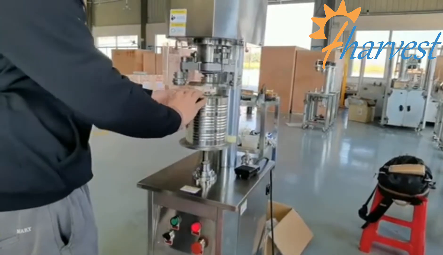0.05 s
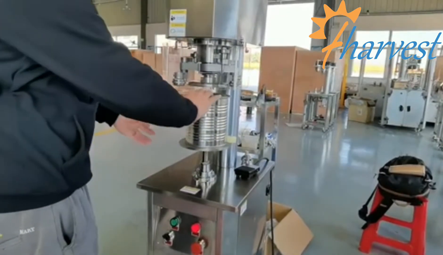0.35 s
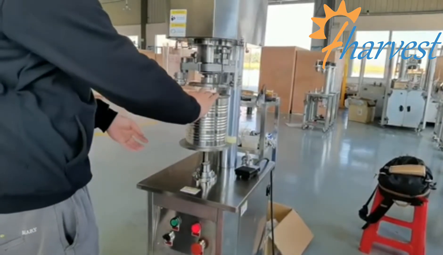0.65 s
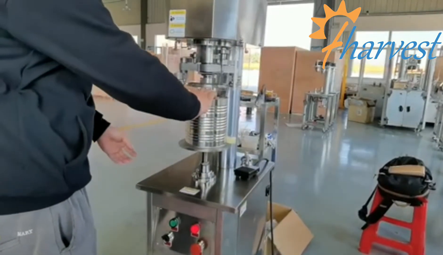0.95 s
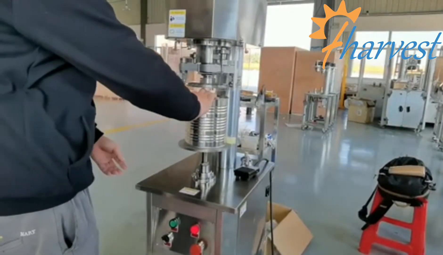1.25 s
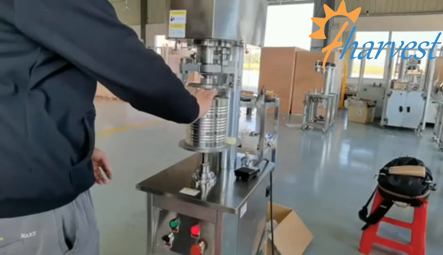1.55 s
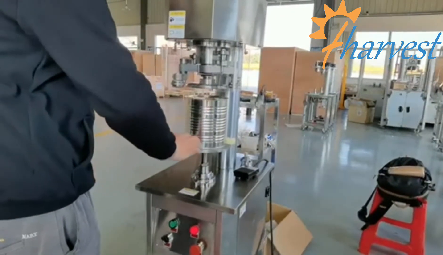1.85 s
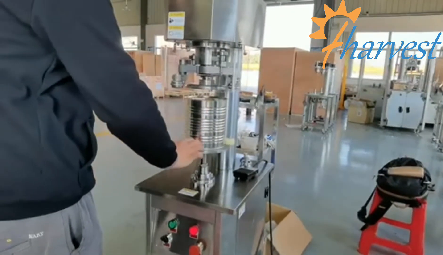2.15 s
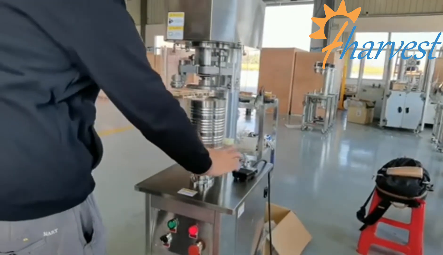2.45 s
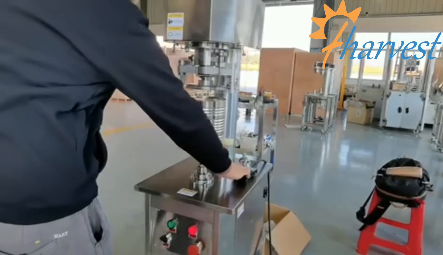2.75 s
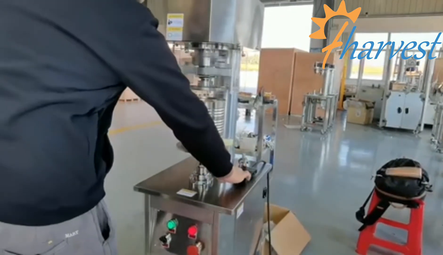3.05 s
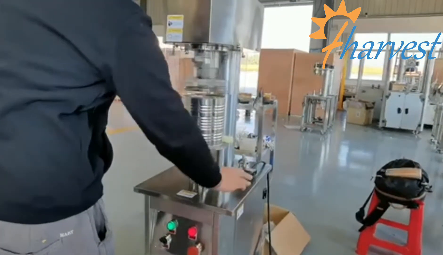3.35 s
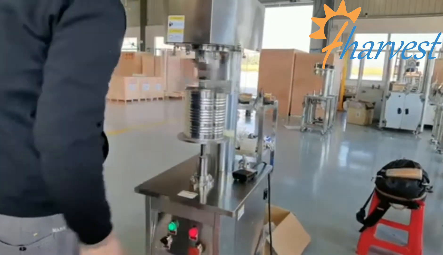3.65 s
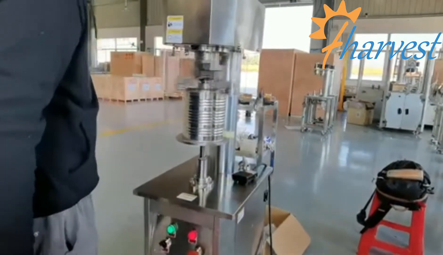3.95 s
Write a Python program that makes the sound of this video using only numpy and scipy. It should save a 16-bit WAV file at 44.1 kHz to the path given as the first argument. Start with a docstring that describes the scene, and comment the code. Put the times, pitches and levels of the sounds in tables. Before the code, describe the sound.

A can seaming machine starts up close by, over a faint factory hall drone. First a metal can scrapes, squeaks and knocks, hardest at 0.6 seconds. A sleeve rustles softly, and a steel part rings at 1.6 seconds. From 2.4 seconds a switch snaps and the motor hums loudly. Rollers grind and briefly squeal on the rim until 3.3 seconds, then the mechanism clanks over the hum until 4 seconds.

```python
"""A can seamer in a factory hall; other machines drone far away throughout.
A metal can is rubbed and knocked into place under the chuck. A sleeve rustles; at 1.6 s a steel part
is brushed and rings. From 2.4 s a switch snaps, then the motor runs up and shakes the steel frame.
The rollers grind round the can's rim until about 3.3 s; the mechanism clanks on over the hum."""
import sys
import numpy as np
from scipy import signal
from scipy.fft import rfft, irfft, next_fast_len
from scipy.io import wavfile
from scipy.ndimage import uniform_filter1d

SR = 44100
rng = np.random.default_rng(int(sys.argv[2]) if len(sys.argv) > 2 else 0)


def pcm_store(signal):
    """Save signal as 16-bit PCM."""
    levels = np.round(np.clip(np.atleast_2d(signal), -1, 1) * 32767)
    wavfile.write(sys.argv[1], SR, levels.astype(np.int16).T)


N = 176400
T = np.arange(N) / SR
N_FFT = next_fast_len(N + SR // 4, True)
BINS_HZ = np.maximum(np.fft.rfftfreq(N_FFT, 1 / SR), 1)


def rollers():
    """Rollers stick and slip on the rim; its modes come and go as it turns and squeal at full pressure."""
    # Each row: time in seconds, level in dB.
    grind_levels = [(2.55, -80), (2.59, -27), (2.7, -31), (2.75, -21.5), (2.92, -21.5), (3.0, -21),
                    (3.14, -18), (3.2, -20.5), (3.245, -17.5), (3.32, -33.5), (3.42, -31.5), (3.6, -42)]
    # Each row: frequency in Hz, relative level in dB.
    grind_spectrum = [(530, -34), (900, -2.5), (1500, -7), (1900, 4), (2420, -0.5), (2690, -25), (2980, -7),
                      (4300, -8), (4900, -4), (8200, -4), (9200, 0), (11900, -17.5), (14100, -25),
                      (15500, -38)]
    # Each row: frequency in Hz, width in Hz, relative gain in dB.
    rim_modes = [(2370, 140, -13.5), (2945, 240, -11.5), (3487, 39, -20), (4030, 64, -20),
                 (4700, 70, -22.5), (5170, 40, -20), (5580, 110, -21), (6020, 110, -18), (6690, 75, -16),
                 (7500, 60, -13), (8770, 31, -18), (9140, 40, -21)]
    # Strongest rim mode. Each row: time in seconds, relative level in dB.
    note_levels = [(2.58, -50), (2.61, -26), (2.68, -32), (2.76, -24), (2.91, -28), (2.97, -21.5),
                   (3.03, -28), (3.11, -21.5), (3.19, -29.5), (3.27, -31), (3.4, -67)]
    # Growl under load. Each row: time in seconds, level in dB.
    growl_levels = [(2.56, -81), (2.62, -23.5), (2.75, -27), (2.86, -36.5), (3.05, -41), (3.3, -30),
                    (3.5, -47)]
    # Each row: frequency in Hz, width in Hz, gain in dB.
    growl_modes = [(590, 17, -7.5), (668.6, 16, -3.5), (785, 8.7, -7.5)]
    slips = grains(13000, spread_db=1.5) * level(grind_levels) * from_db(1.2 * drift(26))
    rim = sum(resonate(slips * from_db(6.5 * np.minimum(drift(17), 1) - 2), [mode]) for mode in rim_modes)
    note = from_db(-2) * level(note_levels) * steady(resonate(noise(), [(1877, 40, 0)]))
    pings = 0
    for hz in np.linspace(3288, 10210, 20) + 85 * rng.standard_normal(20):
        waver_db = 9.5 * np.minimum(drift(15), 1)
        pings += resonate(slips * from_db(waver_db), [(hz, 51, -26.5)])
    peak_s, sigma_s = 3.13, 0.046
    pressure = np.exp(-.5 * ((T - peak_s) / sigma_s) ** 2)
    squeal = resonate(pressure * noise(), [(9370, 35, -24)])
    growl = resonate(grains(1500, spread_db=2.5) * level(growl_levels), growl_modes)
    grind = from_db(-2.5) * panels(colour(slips, grind_spectrum))
    return grind + rim + note + pings + squeal + growl


def motor():
    """Hum and gear tones come up to speed; the frame shakes and the gears rattle with the shaft."""
    # Each row: full-speed frequency in Hz, relative level in dB.
    hum_tones = [(100.5, -28.5), (109, -29), (131, -31.5), (145, -31.5), (191, -27.5), (199, -37),
                 (345, -35.5), (389, -43), (447, -40), (590, -41), (642, -38.5)]
    # Each row: time in seconds, relative bass and low-mid levels in dB.
    shake_levels = [(2.54, -73, -59), (2.592, -25.5, -26), (2.64, -24.5, -28.5), (2.662, -8.5, -26),
                    (2.686, -23.5, -28), (2.742, -16, -21), (2.852, -21.5, -22), (2.906, -10.5, -29.5),
                    (2.966, -24, -23), (3.01, -12, -24), (3.23, -25, -25.5), (3.422, -15.5, -22.5),
                    (3.438, -23, -26), (3.47, -16.5, -32), (3.498, -16, -27.5), (3.616, -26, -26.5),
                    (3.796, -17, -28.5), (4.0, -20, -23)]
    # Each row of these three: frequency in Hz, relative level in dB.
    bass_spectrum = [(30, -41.5), (65, -18), (85, -13.5), (103, -12.5), (135, -6), (157, -5), (190, 6),
                     (225, -10), (280, -11), (400, -33.5), (800, -71)]
    low_mid_spectrum = [(120, -31), (220, -4), (270, 0), (350, -1), (440, 1), (480, -5.5), (590, -2.5),
                        (700, -3), (860, -17), (1200, -7), (2200, -40), (5000, -74)]
    gear_spectrum = [(400, -1), (900, 6.5), (1400, -0.5), (2500, 9.5), (3600, -3.5), (6000, 2.5),
                     (9300, 4.5), (12000, -21), (15500, -32)]
    start_s, run_up_s, shaft_hz, usual_shake_db = 2.57, .035, 24.73, -21
    speed = 1 - np.exp(-np.maximum(T - start_s, 0) / run_up_s)
    clock_s = np.cumsum(speed * (1 + 0.0049 * drift(5.8))) / SR
    shake = level(shake_levels)
    tones = sum(from_db(db - 2.5 + 2.77 * drift(4.6)) * tone(hz, clock_s) for hz, db in hum_tones)
    hum = speed ** 4 * (shake / from_db(usual_shake_db)) ** 0.33 * tones
    turning = 1 + 0.092 * np.sin(2 * np.pi * shaft_hz * clock_s)
    bass = from_db(-5) * shake * steady(colour(grains(1500, spread_db=1.4), bass_spectrum))
    low_mid = steady(colour(grains(1500, spread_db=0.5) * turning, low_mid_spectrum))
    low_mid *= from_db(-1.5) * level(shake_levels, column=2)
    gear_gain = from_db(-36.5 + 1.3 * drift(6.7)) * speed * turning
    gears = gear_gain * colour(grains(7600, spread_db=2.5), gear_spectrum)
    return hum + bass + low_mid + panels(gears)


def clanks():
    """Loose steel parts clank and chatter brightly on the can; the frame clunks as the can is lowered."""
    # Each row: start in seconds, dull and bright levels in dB, decay in seconds.
    hits = [(3.339, -29, -52, 0.039), (3.385, -31, -23, 0.011), (3.396, -18.5, -37, 0.02),
            (3.466, -37, -21, 0.039), (3.583, -40, -28.5, 0.036), (3.618, -47, -25, 0.008),
            (3.71, -25, -36, 0.011), (3.725, -28, -29, 0.067), (3.755, -17.5, -30, 0.018),
            (3.832, -32, -45, 0.085), (3.903, -25, -28.5, 0.021), (3.967, -26.5, -27, 0.023)]
    # Each row: start in seconds, level in dB, decay in seconds.
    frame_hits = [(3.385, -40, 0.018), (3.472, -19, 0.053), (3.96, -17.5, 0.023)]
    # Each row of these two: frequency in Hz, relative level in dB.
    dull_spectrum = [(200, -20.5), (400, 7), (800, -2), (1200, -3.5), (1650, 4.5), (2400, -13), (4000, -19),
                     (10000, -41)]
    bright_spectrum = [(500, -45), (2000, -6.5), (4000, -9.5), (5800, -3.5), (7500, -6.5), (9300, 1),
                       (12000, -14), (15500, -23)]
    # Each row of these three: frequency in Hz, width in Hz, gain in dB.
    part_modes = [(1510, 130, -14), (1830, 89, -19)]
    can_modes = [(6050, 260, -13), (8300, 110, -16)]
    frame_modes = [(333, 13, -7.5), (356, 7.7, -2.5), (397.3, 21, -6), (451, 12, -10)]
    dull = grains(4000, spread_db=0.5) * blows(hits, attack_s=0.0016)
    bright = grains(7200, spread_db=4) * blows(hits, attack_s=0.0025, column=2)
    clunk = resonate(grains(3000, spread_db=0.5) * blows(frame_hits, attack_s=0.0056), frame_modes)
    clatter = from_db(-0.5) * (colour(dull, dull_spectrum) + colour(bright, bright_spectrum))
    return clatter + resonate(dull, part_modes) + resonate(bright, can_modes) + clunk


def switch():
    """Contacts snap as the drive engages; the hardest snaps ring briefly."""
    # Each row: start in seconds, crack and ring levels in dB, decay in seconds.
    snaps = [(2.426, -33.5, -47, 0.023), (2.515, -40, -34, 0.0041), (2.535, -30, -41, 0.0062),
             (2.551, -24.5, -38, 0.012), (2.568, -16.5, -16, 0.0085), (2.604, -21, -45, 0.0082),
             (2.684, -21, -10, 0.0043)]
    # Each row: frequency in Hz, relative level in dB.
    crack_spectrum = [(400, -6.5), (1200, -9), (2500, 4.5), (4000, -2), (6300, 3), (8500, 3), (10500, 0.5),
                      (12500, -24), (15500, -22)]
    # Each row: frequency in Hz, width in Hz, relative gain in dB.
    contact_modes = [(8370, 170, 2)]
    crack = grains(20000, spread_db=2) * blows(snaps, attack_s=0.0014)
    ring = steady(resonate(noise(), contact_modes), samples=200)
    return colour(crack, crack_spectrum) + ring * blows(snaps, attack_s=0.0023, column=2)


def can():
    """The can scrapes and squeaks into place; each knock is a tinny rattle, a ring and a hollow thud."""
    # Each row of these two: time in seconds, relative level in dB.
    slide_levels = [(0, -41), (.12, -47), (.22, -46.5), (.3, -46.5), (.48, -44.5), (.56, -46.5),
                    (.6, -43.5), (.76, -54), (.88, -85)]
    squeak_levels = [(0, -54), (.05, -43.5), (.1, -53), (.14, -61), (.18, -47), (.25, -50.5), (.35, -49),
                     (.39, -85)]
    # Each row: start in seconds, rattle and thud levels in dB, decay in seconds.
    knocks = [(0.002, -44.5, -39.5, 0.05), (.236, -37.5, -59, 0.015), (.279, -39.5, -62, 0.018),
              (.327, -37.5, -59, 0.023), (.345, -32, -37.5, 0.031), (.423, -35.5, -42.5, 0.032),
              (.616, -22.5, -37, 0.043), (.629, -20, -36.5, 0.022), (.836, -48, -42.5, 0.02),
              (1.623, -42.5, -40.5, 0.0095)]
    # Each row of these two: frequency in Hz, relative level in dB.
    slide_spectrum = [(350, -31), (600, -12), (1540, -15), (2430, -1), (2680, -2), (3360, -3), (4060, -0.5),
                      (9750, -3), (15000, -60)]
    rattle_spectrum = [(210, -69), (350, -10.5), (981, -7.5), (1080, -2), (1510, -10), (1760, 0), (2930, 0),
                       (3170, 2), (3440, -2.5), (9480, -3), (15500, -33)]
    # Each row of these four: frequency in Hz, width in Hz, relative gain in dB.
    slide_modes = [(1245, 13, -16.5)]
    squeak_modes = [(3460, 4.7, 2)]
    rattle_modes = [(1786, 30, -21), (2320, 30, -16.5), (3115, 22, -18), (3440, 25, -15.5)]
    thud_modes = [(199, 11.3, -1), (255, 41, 0), (293, 6.5, -6), (436, 220, -39), (890, 450, -8.5)]
    # Each row: frequency in Hz, width in Hz, level in dB, T60 in seconds.
    long_modes = [(2000, 46, -47.5, 1.6), (2330, 30, -48, .8)]
    rub = grains(12000, spread_db=3) * level(slide_levels)
    squeak = from_db(1.5) * level(squeak_levels) * steady(resonate(noise(), squeak_modes))
    rattle = grains(12000, spread_db=0.5) * blows(knocks, attack_s=0.0013)
    thud = resonate(grains(8000, spread_db=3) * blows(knocks, attack_s=0.005, column=2), thud_modes)
    age_s = np.maximum(T - .629, 0)  # since the hardest knock
    ring = sum(from_db(-60 * age_s / t60_s) * resonate(noise(), [mode]) for *mode, t60_s in long_modes)
    scrape = panels(colour(rub, slide_spectrum)) + resonate(rub, slide_modes)
    knock = colour(rattle, rattle_spectrum) + resonate(rattle, rattle_modes) + thud
    return scrape + squeak + knock + ring * (age_s > 0)


def steel_part():
    """Brushing swells each mode at its own pace; they ring out with an uneven shimmer."""
    # Each row: frequency in Hz, level in dB, T60 in seconds, swell in seconds.
    modes = [(3900, -53, 1.3, 0.063), (3937, -39.5, 0.82, 0.067), (3950, -47.5, 1.2, 0.091),
             (6520, -36, 0.81, 0.023), (6370, -56, 0.55, 0.044), (6620, -45, 0.89, 0.026),
             (7660, -45.5, 0.89, 0.054), (7695, -59, 0.59, .04), (9940, -52, 0.59, 0.017)]
    # Each row: start in seconds, level in dB, decay in seconds.
    strokes = [(1.623, -53, 0.027), (1.64, -39, 0.023), (1.659, -40, 0.11), (1.758, -47, 0.096)]
    # Each row: frequency in Hz, relative level in dB.
    brush_spectrum = [(300, -20), (1000, -6), (2200, 1.5), (3600, 0.5), (5000, -2.5), (7000, 3), (9500, -8),
                      (12000, -26), (16000, -48)]
    age_s, ring = np.maximum(T - 1.63, 0), 0
    for hz, db, t60_s, swell_s in modes:
        swell = np.minimum(age_s / swell_s, 1) ** 2
        fade_db = 60 * np.maximum(age_s - swell_s, 0) / t60_s
        shimmer = 1 + 0.53 * np.array([drift(28), drift(28)])
        ring += swell * from_db(db - fade_db) * shimmer * tone(hz, T + .00003 * drift(12.4))
    brush = grains(8000, spread_db=2.5) * blows(strokes, attack_s=0.0038)
    return ring + colour(brush, brush_spectrum)


def sleeve():
    """Cloth rustles as the arm moves; the body shuffles dully."""
    # Each row of these two: time in seconds, level in dB.
    rustle_levels = [(.9, -63), (.99, -50), (1.16, -51.5), (1.32, -60.5), (1.6, -78), (2.1, -74),
                     (2.3, -56.5), (2.41, -42.5), (2.5, -42.5), (2.56, -43), (2.65, -92)]
    shuffle_levels = [(.79, -66), (.83, -44), (.88, -65.5), (1.1, -53.5), (1.165, -49), (1.24, -61),
                      (1.8, -81), (2.0, -61), (2.18, -51), (2.3, -59.5), (2.5, -58.5), (2.6, -93)]
    # Each row of these two: frequency in Hz, relative level in dB.
    rustle_spectrum = [(200, -9), (700, 4), (1200, -5.5), (2400, 10), (4000, -4), (6500, 1), (9500, -2),
                       (11000, -28), (12500, -56), (16000, -92)]
    shuffle_spectrum = [(120, -36), (300, 19.5), (650, 8.5), (1000, -17), (2000, -25), (8000, -38),
                        (13000, -75)]
    rustle = colour(grains(11000, spread_db=5) * level(rustle_levels), rustle_spectrum)
    shuffle = colour(grains(2000, spread_db=1) * level(shuffle_levels), shuffle_spectrum)
    return rustle + shuffle


def panels(x, count=6, highpass_hz=1120, delay_range_s=(.003, .022)):
    """Steel panels reflect the treble within milliseconds: a metallic colour."""
    treble = signal.sosfilt(signal.butter(2, highpass_hz, "high", fs=SR, output="sos"), x)
    lags = (rng.uniform(*delay_range_s, size=(2, count)) * SR).astype(int)
    echoes = np.array([sum(np.pad(path, (lag, 0))[:N] for lag in row) for path, row in zip(treble, lags)])
    gain = from_db(-5.5)
    return (x + gain * echoes / np.sqrt(count)) / np.sqrt(1 + gain ** 2)


def hall(x, t60_s=0.58, delay_s=0.007, gain_db=-15.5):
    """Diffuse tail of the hall."""
    decay = from_db(-60 * T[:SR] / t60_s) * (T[:SR] > delay_s)
    tail = rms_one(rng.standard_normal((2, SR)) * decay) / np.sqrt(SR)
    return from_db(gain_db) * signal.fftconvolve(x, tail, axes=1)[:, :N]


def background():
    """Wavering drone of far machines and air rumble."""
    # Each row of these two: frequency in Hz, relative level in dB.
    far_tones = [(206, -55), (404, -68), (410, -69), (820, -69.5)]
    air_spectrum = [(20, -33), (40, -2.5), (65, 4.5), (100, -0.5), (150, -4.5), (210, -5), (330, -15.5),
                    (520, -22.5), (750, -19), (1200, -27.5), (2300, -26), (4000, -34), (9500, -29.5),
                    (11500, -53), (16000, -62)]
    drone = sum(from_db(db + 2.3 * drift(3.4)) * tone(hz, T + 0.00051 * drift(1.36))
                for hz, db in far_tones)
    return drone + from_db(-46.5) * colour(noise(), air_spectrum)


def from_db(db):
    """Decibels to gain."""
    return 10 ** (np.asarray(db) / 20)


def rms_one(x):
    """Scale to rms 1."""
    return x / np.sqrt(np.mean(x ** 2) + 1e-20)


def steady(x, samples=1500):
    """Hold the running rms at 1."""
    return x / np.sqrt(np.maximum(uniform_filter1d(x ** 2, samples, axis=1), 1e-20))


def level(rows, column=1):
    """Gain over time from a dB column; silent until 30 ms before the first row."""
    rows = np.array(rows)
    return from_db(np.interp(T, rows[:, 0], rows[:, column])) * (T >= rows[0, 0] - .03)


def blows(rows, attack_s, column=1):
    """Envelope of blows, summed in power: linear rise, exponential decay."""
    power = 0
    for row in rows:
        age_s = np.maximum(T - row[0], 0)
        rise = np.minimum(age_s / attack_s, 1)
        decay = np.exp(-np.clip((age_s - attack_s) / row[-1], 0, 20))
        power += (from_db(row[column]) * rise * decay) ** 2
    return np.sqrt(power)


def noise():
    """White noise on two paths."""
    return rng.standard_normal((2, N))


def drift(rate_hz, hop=40, settle=2000):
    """Smooth random curve of rms 1."""
    pole = np.exp(-2 * np.pi * rate_hz * hop / SR)
    white = rng.standard_normal(N // hop + settle + 2)
    slow = signal.lfilter([1], [1, -2 * pole, pole * pole], white)[settle:]
    return np.interp(np.arange(N) / hop, np.arange(len(slow)), rms_one(slow))


def grains(per_s, spread_db):
    """Tiny random contacts of uneven size on two paths; rms 1."""
    contacts = rng.random((2, N)) < per_s / SR
    sizes = from_db(spread_db * np.minimum(rng.exponential(1, N), 3))
    return rms_one(contacts * sizes * rng.choice([-1, 1], (2, N)))


def tone(hz, clock_s):
    """Sine of rms 1 on two paths, a quarter turn apart."""
    phase = 2 * np.pi * (hz * clock_s + rng.random())
    return np.sqrt(2) * np.array([np.sin(phase), np.cos(phase)])


def resonate(x, modes):
    """Parallel resonances; white noise of rms 1 leaves each at its own level."""
    out = 0
    for hz, width_hz, db in modes:
        r = np.exp(-np.pi * abs(width_hz) / SR)
        poles = [1, -2 * r * np.cos(2 * np.pi * hz / SR), r * r]
        out += from_db(db) * np.sqrt((1 - r * r) / 2) * signal.lfilter([1, 0, -1], poles, x + 1e-18)
    return out


def per_bin(points):
    """Interpolate over log frequency at every bin."""
    hz, value = np.transpose(points)
    return np.interp(np.log(BINS_HZ), np.log(hz), value)


def colour(x, spectrum):
    """Minimum-phase filter that keeps the power of white noise."""
    cepstrum = irfft(np.log(rms_one(from_db(per_bin(spectrum))) + 1e-9), N_FFT)
    cepstrum[1:N_FFT // 2] *= 2
    cepstrum[N_FFT // 2 + 1:] = 0
    return irfft(rfft(x, N_FFT) * np.exp(rfft(cepstrum)), N_FFT)[:, :N]


def scene():
    """All sources in the hall; the two paths are mid and side: narrow bass, wide treble."""
    # Each row: frequency in Hz, left-right correlation before clipping.
    likeness = [(60, 0.8), (130, 4), (200, 0.6), (380, 0.7), (700, 0.76), (1000, 0.21), (2380, -.5),
                (4400, 0), (8000, 0), (15000, 0)]
    # Each row: frequency in Hz, left minus right in dB.
    balance = [(60, 3), (110, 3), (200, 0.5), (400, 1.6), (700, 2), (1300, 0.9), (4400, -0.6), (6000, -2.5),
               (8200, 3.5), (15000, 10)]
    near = can() + steel_part() + sleeve() + switch() + motor() + rollers() + clanks()
    mid, side = rfft(near + hall(near) + background(), N_FFT)
    correlation = np.clip(per_bin(likeness), -.99, .99)
    signs = np.array([[1], [-1]])
    stereo = np.sqrt((1 + correlation) / 2) * mid + signs * np.sqrt((1 - correlation) / 2) * side
    return irfft(stereo * from_db(signs * per_bin(balance) / 2), N_FFT)[:, :N]


def record(dry):
    """Steep low-pass at 15.6 kHz."""
    return signal.sosfilt(signal.ellip(10, .1, 90, 15600, fs=SR, output="sos"), dry)


dry = scene()
out = record(dry)
pcm_store(out)
```